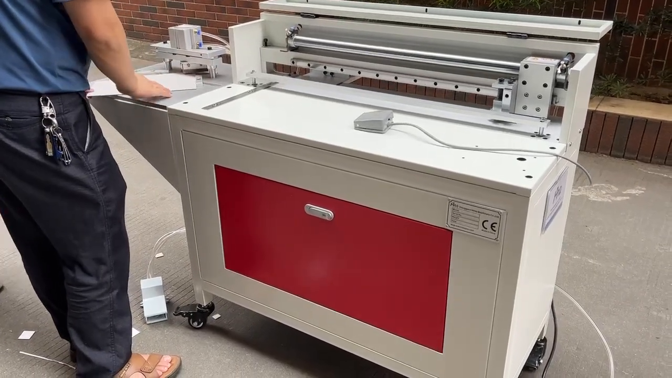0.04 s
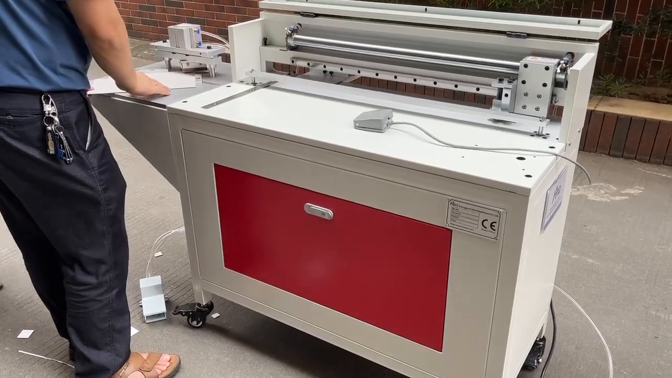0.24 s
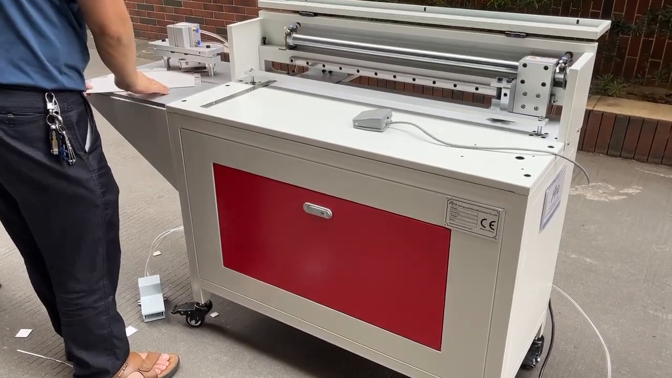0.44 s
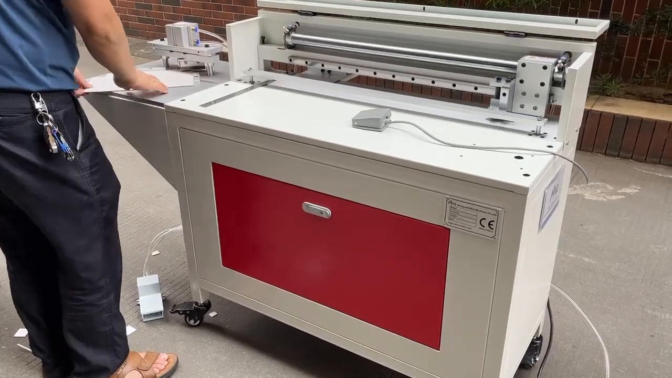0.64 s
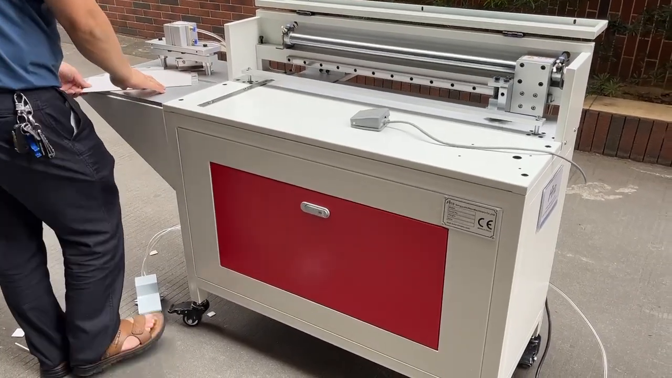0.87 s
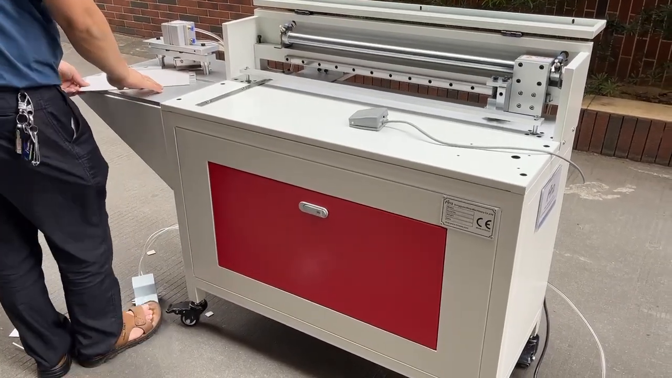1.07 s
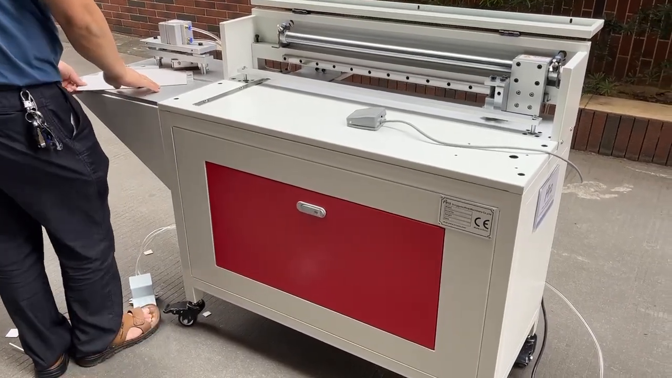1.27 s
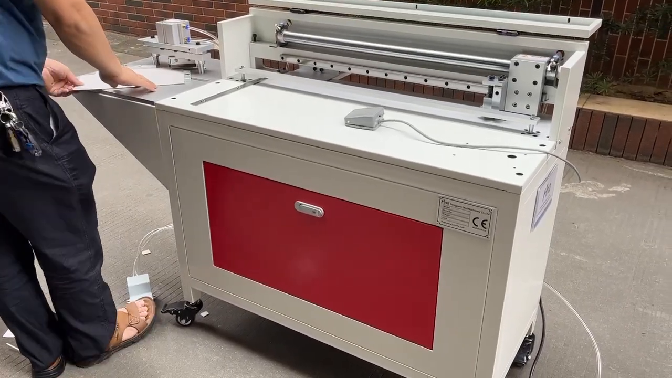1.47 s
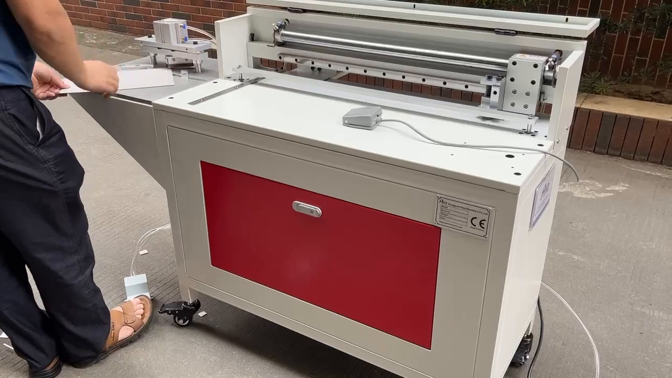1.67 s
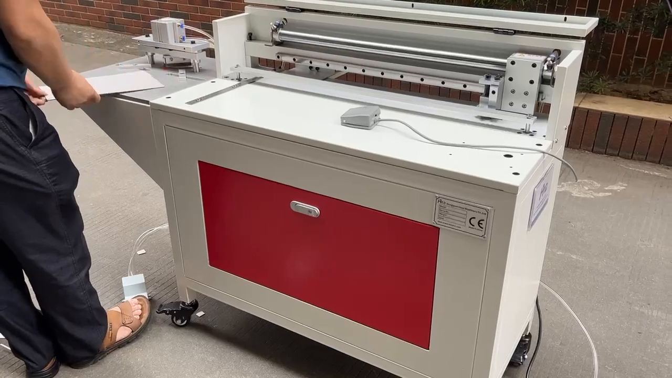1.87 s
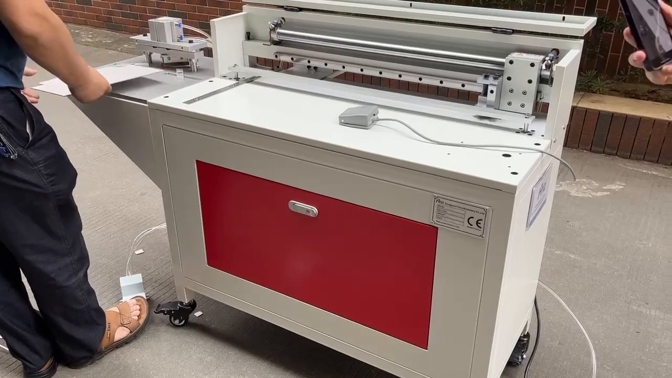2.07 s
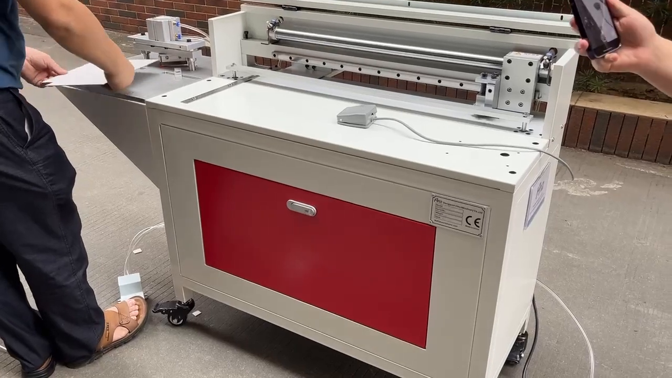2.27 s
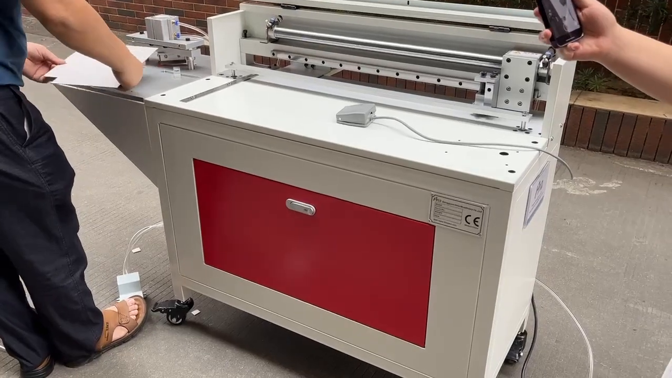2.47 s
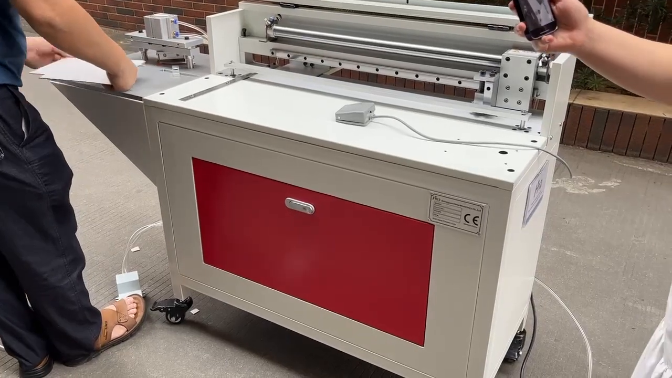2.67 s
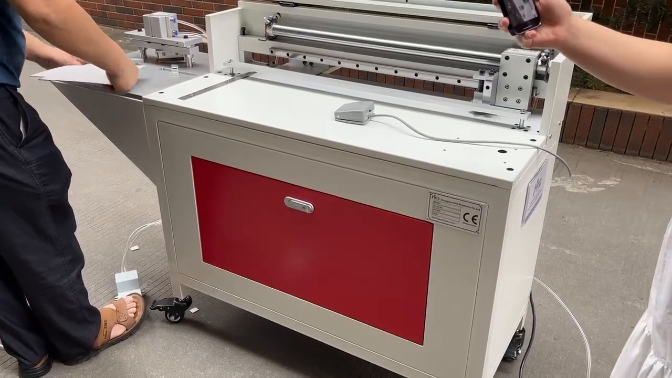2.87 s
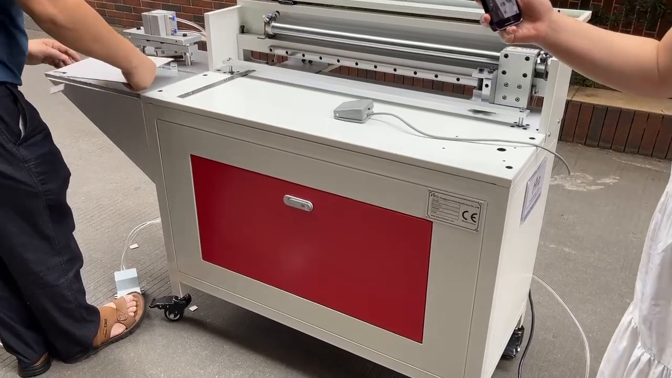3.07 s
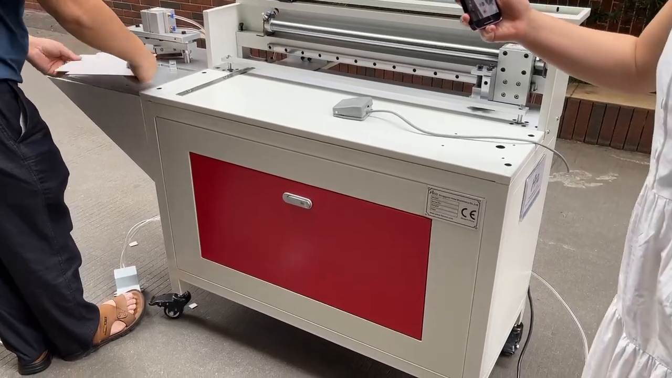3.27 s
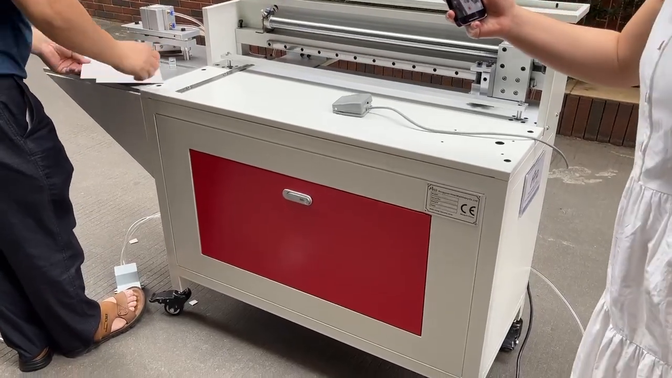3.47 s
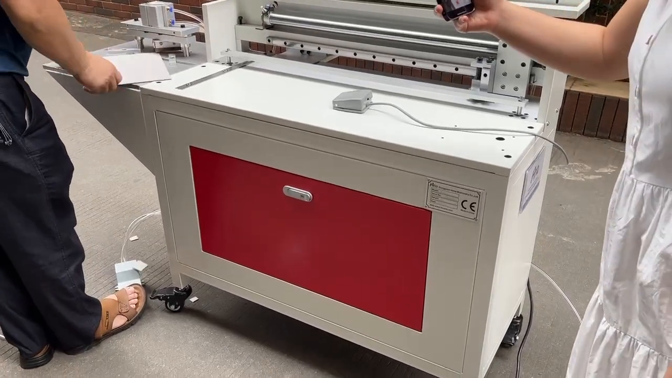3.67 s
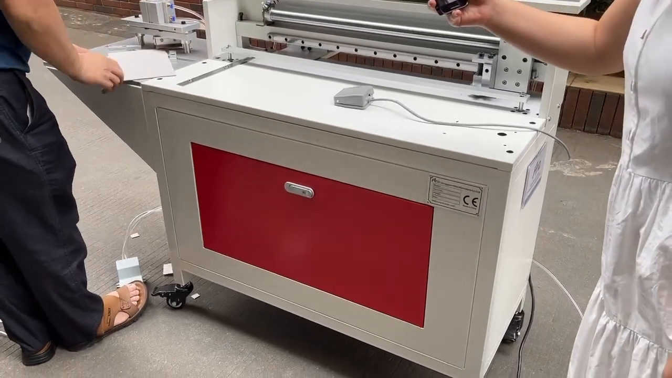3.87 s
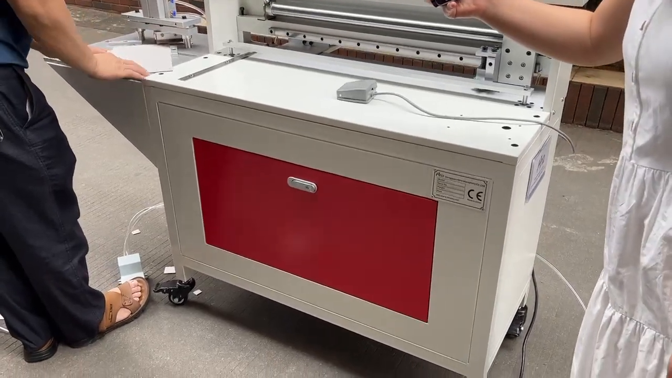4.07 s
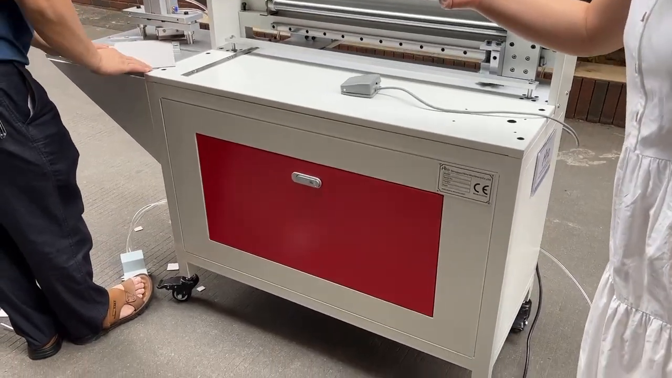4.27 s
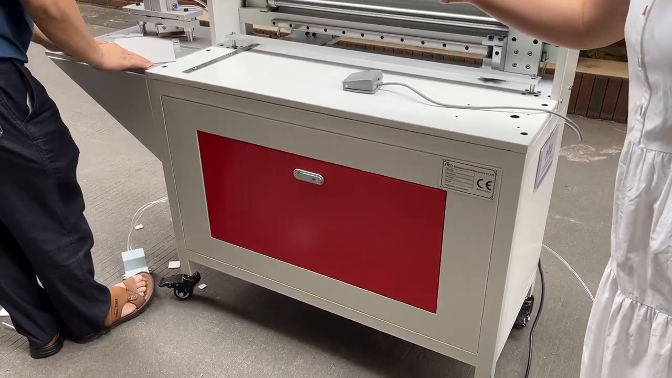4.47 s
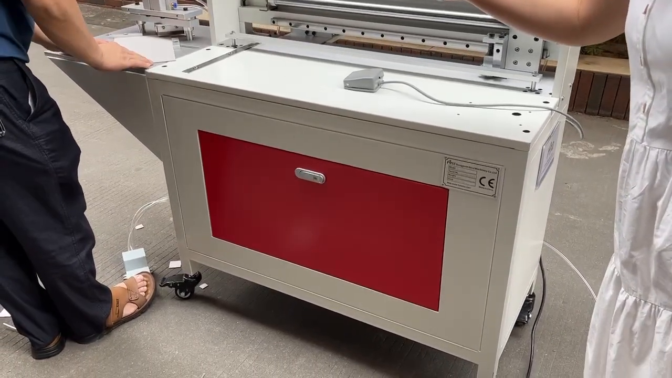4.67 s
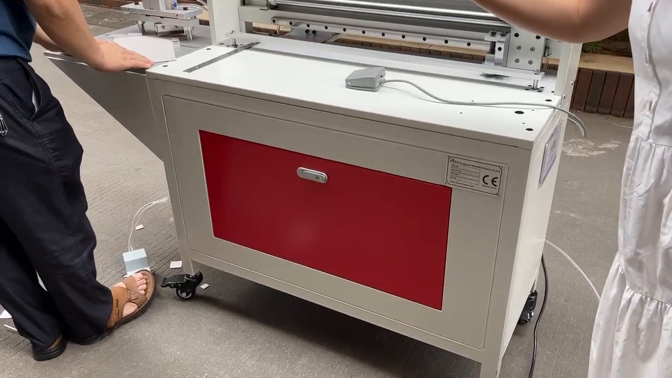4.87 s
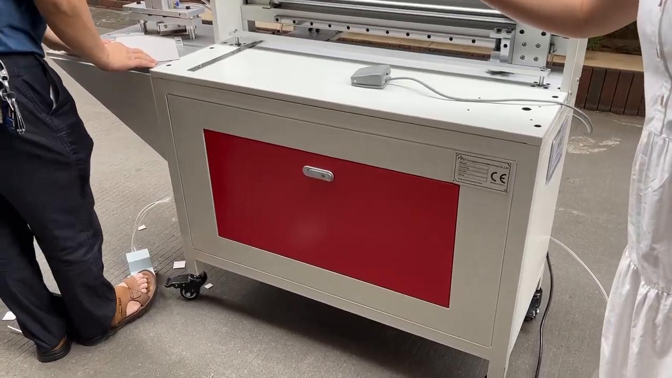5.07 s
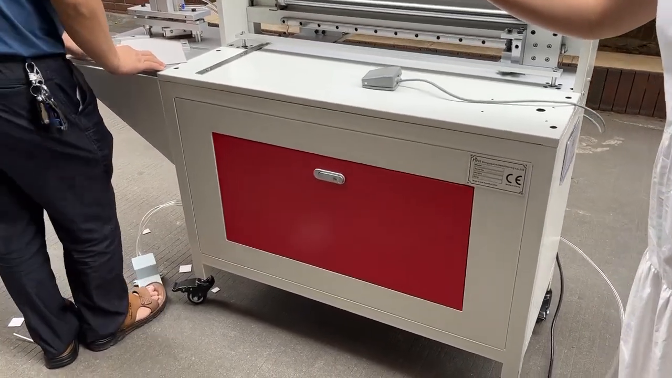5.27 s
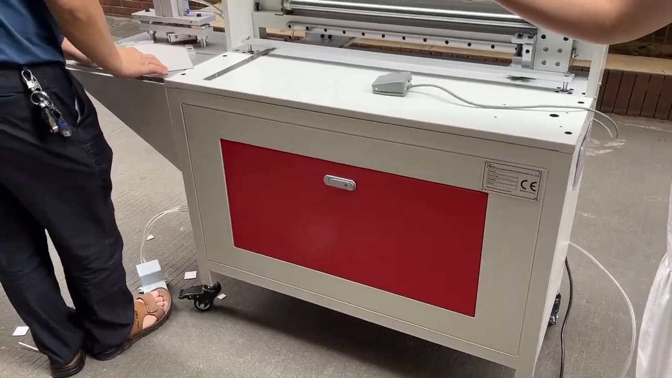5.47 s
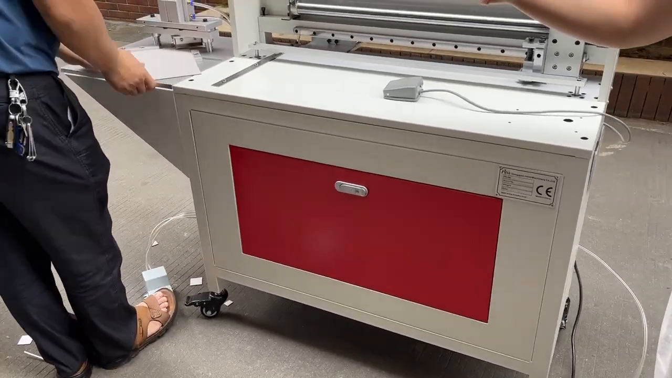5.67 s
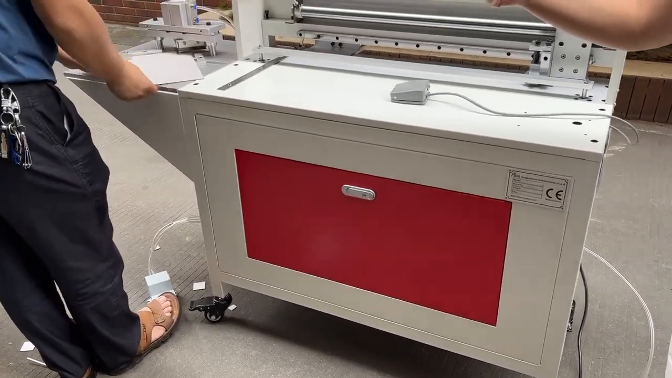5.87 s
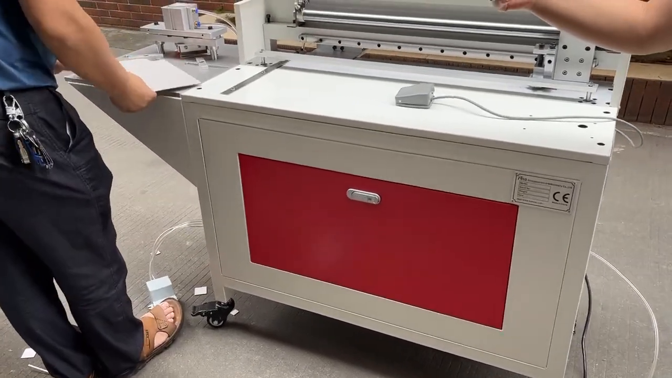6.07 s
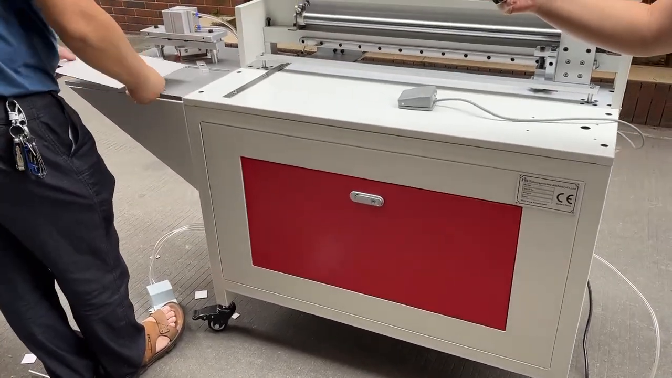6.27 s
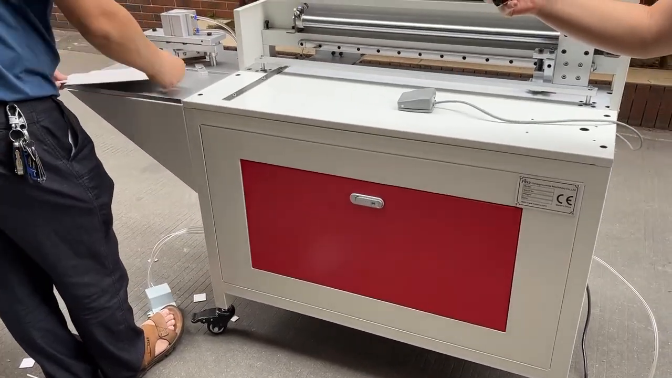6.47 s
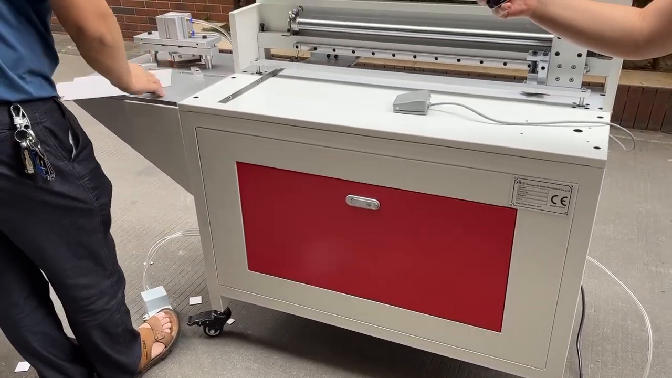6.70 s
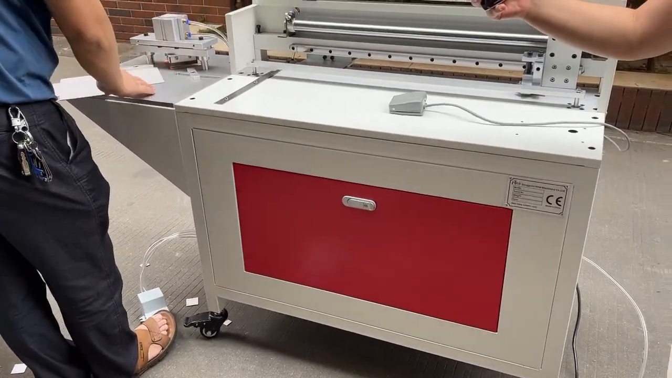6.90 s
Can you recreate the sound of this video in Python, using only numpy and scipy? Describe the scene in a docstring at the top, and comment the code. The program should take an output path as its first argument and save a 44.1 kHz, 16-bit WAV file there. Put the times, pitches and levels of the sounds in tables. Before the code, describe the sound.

In a brick-walled yard, a vacuum pump drones with slow pulsing swells under a steady airy hiss. Near the start a valve spits, a muffled thud shudders the frame, then a stronger air burst leads into a loud sheet-metal slam with rattling. After several seconds of plain drone and a faint card tap, the pair of blows repeats. A sharper card tap follows. Close stereo microphone, short outdoor reflections.

```python
"""Cardboard cutting and grooving machine

A vacuum pump drones in a walled yard; air hisses steadily through the feed table.
The machine works twice. In each cycle a valve spits air, a muffled thud sounds and a cylinder shudders;
the valve vents again, the carriage slams into the sheet-steel cabinet and the frame shudders once more.
Pump: tones locked to the shaft, plus noise. Impacts: decaying modes and noise. Air and card: shaped noise."""
import sys
import numpy as np
from scipy import signal
from scipy.fft import rfft, irfft, next_fast_len
from scipy.io import wavfile
from scipy.ndimage import uniform_filter1d, map_coordinates

SR = 44100
rng = np.random.default_rng(int(sys.argv[2]) if len(sys.argv) > 2 else 0)


def generate_wav(sig):
    """Save sig (samples, or channels by samples) to the path in sys.argv[1] as 16-bit PCM at SR."""
    pcm = np.round(np.clip(np.atleast_2d(sig).T, -1, 1) * 32767).astype(np.int16)
    wavfile.write(sys.argv[1], SR, pcm)


N = 306054

# Steady pump tones. Each row: multiple of the shaft rate, mean level in dB.
PUMP_TONES = [(2, -49.5), (3, -58), (4, -56), (5, -63.5), (7, -59), (10, -61), (11, -71), (12, -67),
              (13, -61.5), (14, -63), (15, -60.5), (19, -55.5), (24, -60), (36, -71), (37, -62), (40, -66),
              (41, -65), (43, -60.5), (45, -66.5)]
# Beating pump tones. Each row: multiple of the shaft rate, level in dB, beats per second,
# depth 0-1, time of a strong crest in seconds.
BEATING_TONES = [(8, -52, 0.928, 0.58, 2.85), (9, -58, 0.375, 0.9, 2.3)]
# Swells of the main pump tone. Each row: start in seconds, crest level in dB.
HUM_SWELLS = [(-0.15, -43), (0.55, -40.5), (1.351, -42.5), (1.9, -40.5), (2.56, -44), (3.17, -38.5),
              (4.08, -44.5), (4.68, -42), (5.35, -40), (5.92, -39), (6.78, -44), (7.3, -45)]
# Air churned by the pump. Each row: frequency in Hz, relative level in dB per Hz.
DRONE_SPECTRUM = [(15, -24), (25, -24), (59, 0), (85, -0.5), (151, -8.5), (216, -7), (270, -11), (344, -11),
                  (393, -8.5), (448, -6), (571, -5.5), (715, -13.5), (1000, -11), (1210, -15), (1510, -14),
                  (2200, -23.5), (2860, -37), (4840, -120)]
# Upper pump orders. Each row: frequency in Hz, relative level in dB.
WHINE_SPECTRUM = [(250, 13), (550, 0), (750, 8.5), (1050, 2.5), (1500, -20), (2100, 4), (3200, -1),
                  (4200, 4), (5200, 1), (7000, -56)]
# Air drawn through the feed table. Each row: frequency in Hz, relative level in dB per Hz.
HISS_SPECTRUM = [(880, -12), (1500, -9), (1960, -8), (2650, 2), (3360, 1), (4090, -5.5), (5430, -0.5),
                 (6500, -8.5), (7500, -17.5), (9500, -24), (11200, -15.5), (12500, -38.5)]
# Stretch of harder hiss: start in seconds, end in seconds, ramp in seconds, gain in dB.
HISS_SWELL = (0.4, 4.74, 0.22, 1.68)
# Carriage contacts. Each row: start in seconds, relative level in dB, muffling edge in Hz,
# then gains in dB: contact on the stop, boom band, knock band, clank band of the contact.
BLOWS = [(0.097, -33.5, 604, -3, -3.5, 0, 3), (1.119, -22.5, 380, 6, 1.5, 0.5, 8),
         (1.160, -28, 400, 2, 2.5, -2, -3), (1.198, -30, 1810, -6, -3, -3, -7),
         (1.486, -17, 4080, 7, -4, 4.5, -9), (1.503, -22.5, 3500, 0, -2.5, 1, 2),
         (1.690, -35.5, 2390, -15, 7, 2, -4), (1.724, -42, 2150, -15, 0.5, -6, 1),
         (5.199, -20.5, 340, 8, 1, -6, 2), (5.272, -26.5, 1900, 0, 1.5, -0.5, 2),
         (5.611, -16, 4300, 6, -2.5, -2, 1.5), (5.625, -23.5, 1490, 1, 2, 3, 7),
         (5.660, -24, 883, -8, 3.5, -2, -2), (5.757, -29, 704, -4, -5, 2, -6),
         (5.887, -37, 617, -1, 8.5, -3, -5)]
# Cabinet modes. Each row: frequency in Hz, relative level in dB, t60 in seconds.
CABINET_MODES = [(191.3, 1.5, 0.71), (266.2, -1.5, 0.19), (363.7, 5.5, 0.62), (440, 4, 0.43),
                 (540.4, 0.5, 0.65), (565, -0.5, 0.73), (749, -2.5, 0.6), (796, -6, 0.43), (853, -3, 0.51),
                 (941, -0.5, 0.31), (1128, -1.5, 0.4), (1256, -4.5, 0.56), (1348, -5, 0.85),
                 (1435, -5.5, 1), (1680, -4, 0.25), (1855, -6, 0.3), (1900, -6, 0.32), (2040, -6.5, 0.48),
                 (2110, -7, 0.4), (2220, -4, 0.47), (2740, -10, 0.22), (3070, -7, 0.42), (3390, -6, 0.35)]
# Heavily damped steel stop. Each row: frequency in Hz, relative level in dB, t60 in seconds.
STOP_MODES = [(277.3, 0, 0.092), (445, -1.5, 0.047), (551.5, 3.5, 0.076), (594, 2, 0.069),
              (950, 3.5, 0.034), (1707, 6, 0.038), (1857, 5, 0.025), (2008, -5, 0.061), (2237, -2, 0.034),
              (2684, 4, 0.019), (3240, -2.5, 0.049), (3840, -7, 0.037)]
# Dense modes of the thin panels. Each row: frequency in Hz, relative level in dB per Hz.
PANEL_SPECTRUM = [(30, -31), (60, 0), (150, 0.5), (240, 0), (300, -4.5), (370, 1.5), (560, -0.5), (750, -3),
                  (930, -12), (1400, -3), (1580, -15), (1720, -11.5), (1950, -4), (2450, -10), (3000, -8),
                  (4500, -19), (9000, -48)]
# Panel decay. Each row: frequency in Hz, t60 in seconds.
PANEL_T60_S = [(100, 0.8), (400, 0.29), (1000, 0.32), (3000, 0.28), (9000, 0.15)]
# Crack of the contact. Each row: frequency in Hz, relative level in dB per Hz.
CRACK_SPECTRUM = [(60, 14), (260, 10), (380, 6.5), (560, 8.5), (750, -10), (1000, 16), (1450, -22),
                  (1720, -2), (2800, -3), (4200, -11), (9000, -36)]
# Yard decay. Each row: frequency in Hz, t60 in seconds.
YARD_T60_S = [(100, 1.76), (500, 0.99), (2000, 1.08), (5000, 0.56), (11000, 0.31)]
# Strength of the walls' answer. Each row: frequency in Hz, relative level in dB.
ECHO_SPECTRUM = [(60, 11), (400, -4), (2000, -3.5), (5000, 0), (11000, -6)]
# Valve exhausts. Each row: start in seconds, level in dB, rise in seconds, t60 in seconds,
# sizzle relative to jet in dB.
PUFFS = [(1.037, -30, 0.017, 0.19, 2.5), (1.080, -28, 0.017, 0.27, -6), (1.415, -20, .016, 0.28, -5),
         (5.119, -30.5, 0.012, 0.2, -1), (5.157, -29, 0.022, 0.26, -7), (5.533, -20.5, 0.021, 0.314, -9)]
# Exhaust jet. Each row: frequency in Hz, relative level in dB per Hz.
JET_SPECTRUM = [(100, -15), (290, -8), (520, 4.5), (780, -0.5), (1090, 7.5), (1350, -0.5), (1720, 4),
                (1880, 3), (2030, 5), (2300, 2), (2780, 5.5), (3300, 1.5), (4300, 3.5), (5300, -1.5),
                (6480, 0.5), (8500, -5.5), (12000, -9)]
# Sizzle on the jet. Each row: frequency in Hz, relative level in dB per Hz.
SIZZLE_SPECTRUM = [(6000, -59), (9000, 6), (10200, 4.5), (11300, 1), (12500, -54)]
# Clicks of the valve's spool. Each row: start in seconds, relative level in dB.
SPURTS = [(1.048, -33), (1.06, -35), (1.430, -21), (1.436, -23), (5.126, -24), (5.144, -27), (5.169, -31),
          (5.182, -26), (5.203, -33), (5.543, -29), (5.555, -25.5), (5.563, -27)]
# Valve body modes. Each row: frequency in Hz, relative level in dB, t60 in seconds.
SPOOL_MODES = [(1117, 2, 0.066), (1810, -15, 0.037), (2376, -1, 0.03), (2780, -5, 0.07), (3920, -5, 0.1),
               (4624, -5, 0.14), (5380, -4, 0.086), (6560, -9, 0.071)]
# Clatter of loose parts. Each row: start in seconds, length in seconds, first relative level in dB,
# fall in dB.
CLATTERS = [(1.114, 0.19, -33, 9), (1.497, 0.29, -25.5, 16), (5.195, 0.22, -28, 7), (5.62, 0.31, -23, 17)]
# Cylinder strokes, down and back. Each row: start in seconds, travel in seconds, final relative level in dB,
# growth on the way in dB, settled frame pitch in Hz, quiver left afterwards in dB.
STROKES = [(1.115, 0.13, -21, 15, 86.8, -15), (1.495, 0.25, -28.5, 10, 96.8, -9.5),
           (5.19, 0.13, -24, 8, 88.5, -9), (5.64, 0.079, -25.5, -5, 77.13, -11.5)]
# Loose guides. Each row: frequency in Hz, relative level in dB per Hz.
RATTLE_SPECTRUM = [(35, -10), (150, 3.5), (280, 7.5), (540, -10), (800, -13.5), (1400, -9), (1800, -14),
                   (2900, -15), (4500, -24), (9000, -35)]
# Card dragged over the table. Each row: start in seconds, length in seconds, level in dB.
SCRAPES = [(1.256, 0.097, -42.5), (5.49, 0.064, -42.5)]
# Card tapping the table. Each row: start in seconds, relative level in dB.
TAPS = [(3.480, -37.5), (6.520, -24.5)]
# Card edge. Each row: frequency in Hz, relative level in dB per Hz.
CARD_SPECTRUM = [(300, -21), (850, -9), (1110, 14), (1270, -7), (1420, 12.5), (1600, -1), (1830, 11),
                 (2200, 2), (2550, 5), (2970, 8), (3400, 2), (4020, 2.5), (4810, -3), (6200, -8),
                 (9000, -22)]
# Stereo width of the pump. Each row: frequency in Hz, side over mid in dB.
PUMP_WIDTH = [(60, -23), (110, -18), (230, -5), (350, -3), (630, -1), (1140, 2), (1400, 0.5), (1570, 7),
              (1800, -11), (2050, -8.5), (2700, -6.5), (4200, -2), (5500, -3), (7000, 3.5), (8500, 9),
              (10000, 2.5)]
# Stereo width of everything else. Each row: frequency in Hz, side over mid in dB.
WORK_WIDTH = [(60, -36.5), (190, -41), (330, -21), (540, -3.5), (1140, -3), (1600, 3.5), (1900, -8.5),
              (2450, -7.5), (3100, -2), (4500, -4), (7000, -1.5), (8500, 6), (10000, -2)]
# Stereo balance. Each row: frequency in Hz, left over right in dB.
LEFT_BALANCE = [(60, -0.5), (150, 2), (550, 2.5), (1200, -0.5), (2000, -1), (3700, 3), (6500, 4),
                (10000, -1)]

SHAFT_HZ, MAINS_HZ = 23.7, 100
HUM_ORDER, HUM_TROUGH = 6, 0.14  # multiple of the shaft rate; share of the crest left between swells
ALTERNATE, FOURTH = 0.18, 0.066  # shares by which every second and every fourth beat is stronger
WAVER_DB, MAINS_DB, WHINE_DB, DRONE_DB, HISS_DB = 1.8, -50.5, -49.5, -45, -48
THUD_LOW_HZ = 55  # the blows carry little sound below this
BOOM_HZ, KNOCK_HZ, CLANK_HZ = (70, 357), (450, 656), (790, 1360)  # depend on where the carriage lands
BLOOM_S, CONTACT_RISE_S = 0.0057, 0.00087  # the panels pick up a blow more slowly
BLUR_HZ = 7
SPUTTER_DB, SURGE_DB = 1.2, 1.0  # fast and slow unevenness of the jet
SPURT_RING_DB, SPURT_AIR_DB, SPURT_T60_S = -5.5, 0, 0.02
CLINK_HZ, CLINK_SPREAD, CLINK_CYCLES = 1344, 0.55, 42  # typical pitch, scatter (natural log), t60 in cycles
CLINKS_PER_S = 90
SHUDDER_ATTACK_S, SHUDDER_T60_S, QUIVER_T60_S = 0.029, 0.2, 2.5
START_SHARP, SETTLE_S = 0.15, 0.034  # share by which the pitch starts high; time constant of its settling
SWING_JITTER, SWING_DB, RATTLE_DB = 0.05, 1.0, -11.5
YARD_DB, YARD_DELAY_S = -10.0, 0.02
LEFT_LEAD_S = 0.000012
LOW_CUT_HZ, TOP_HZ = 29, 11900


def amp(db):
    """Decibels to gain."""
    return 10 ** (np.asarray(db) / 20)


def along(points, hz):
    """(Hz, value) points read on a log frequency axis."""
    point_hz, value = np.transpose(points)
    return np.interp(np.log(hz + 1), np.log(point_hz + 1), value)


def wobble(knots_per_s):
    """Smooth random curve through Gaussian knots."""
    knots = rng.standard_normal(int(N * knots_per_s / SR) + 4)
    return map_coordinates(knots, [np.arange(N) * knots_per_s / SR])


def filtered(x, response):
    """x times a response of frequency."""
    n = x.shape[-1]
    padded = next_fast_len(n + SR // 10)
    spectrum = rfft(x, padded) * response(np.fft.rfftfreq(padded, 1 / SR))
    return irfft(spectrum, padded)[..., :n]


def noise(spectrum, width, size):
    """Coloured stereo noise whose middle has rms 1."""
    def colour(hz):
        return amp(along(spectrum, hz)) * np.array([np.ones_like(hz), amp(along(width, hz))])

    mid, side = filtered(rng.standard_normal((2, size)), colour)
    return np.array([mid + side, mid - side]) / np.std(mid)


def dying(x, t60s):
    """Each frequency of x fades at its own speed."""
    hz, t, z = signal.stft(x, SR, nperseg=256)
    decay = amp(-60 * t / along(t60s, hz)[:, None])
    return signal.istft(z * decay, SR)[1][:, :x.shape[-1]]


def fade(t, t60_s):
    """Exponential decay by 60 dB in t60_s."""
    return np.exp(-np.log(1000) * t / t60_s)


def add(out, start_s, x):
    """Mix x into out from start_s."""
    part = out[:, round(start_s * SR):][:, :x.shape[-1]]
    part += x[:, :part.shape[-1]]


def patchy(x, depth_db):
    """Turbulence: patches of x, some hundred hertz wide, swell and sink."""
    z = signal.stft(x, SR, nperseg=1024)[2]
    field = rng.standard_normal(z.shape[1:])
    field = uniform_filter1d(field, size=7, axis=0)
    field = uniform_filter1d(field, size=8, axis=1)
    return signal.istft(z * amp(depth_db * field / np.std(field)), SR)[1][:, :x.shape[-1]]


def ringing(modes, t):
    """Modes of random strength; loose joints blur their pitch; phase differs between the channels."""
    hz, level_db, t60_s = np.transpose(modes)[:, :, None]
    strength = amp(level_db + 1.1 * rng.standard_normal(hz.shape)) * fade(t, t60_s)
    steps = rng.standard_normal((len(hz), len(t)))
    blur = np.cumsum(steps, axis=1) * np.sqrt(2 * np.pi * BLUR_HZ / SR)
    phase = 2 * np.pi * (hz * t + rng.random(hz.shape)) + blur
    skew = np.arctan(amp(along(WORK_WIDTH, hz)))
    return np.array([np.sum(strength * np.sin(phase + side * skew), axis=0) for side in (-1, 1)])


def boost(x, band_hz, db):
    """Raise or lower one broad band of x."""
    edges_hz = np.clip(np.sort(band_hz), 20, SR / 4)
    band = signal.butter(1, edges_hz, "bandpass", fs=SR, output="sos")
    return x + (amp(db) - 1) * signal.sosfilt(band, x)


def hum(tone):
    """The main pump tone rises and falls in rounded swells."""
    starts_s, crest_db = np.transpose(HUM_SWELLS)
    beat = np.interp(np.arange(N) / SR, starts_s, np.arange(len(starts_s)))
    crest = amp(uniform_filter1d(crest_db[beat.astype(int)], size=4000))
    return crest * np.hypot(np.sin(np.pi * beat), HUM_TROUGH) * tone(HUM_ORDER)


def beating(tone):
    """Two more pump tones swell and fade in regular beats, strong and weak by turns."""
    out, t = np.zeros(N), np.arange(N) / SR
    for order, db, beats_per_s, depth, crest_s in BEATING_TONES:
        angle = 2 * np.pi * beats_per_s * (t - crest_s)
        swell = np.abs(1 + depth * np.exp(1j * angle))
        swell = swell * (1 + ALTERNATE * np.cos(angle / 2) + FOURTH * np.cos(angle / 4))
        out += amp(db) * swell * tone(round(order))
    return out


def suction():
    """Air hisses steadily through the feed table, with one broad swell."""
    start_s, end_s, ramp_s, gain_db = HISS_SWELL
    t = np.arange(N) / SR
    swell = np.clip(np.minimum(t - start_s, end_s - t) / ramp_s, 0, 1)
    level_db = HISS_DB + gain_db * swell + 0.38 * wobble(11.0)
    return amp(level_db) * patchy(noise(HISS_SPECTRUM, PUMP_WIDTH, size=N), depth_db=1.9)


def pump():
    """Tones and a vane rattle repeat with each shaft turn; the churned air throbs with the shaft."""
    turns = np.cumsum(SHAFT_HZ * (1 + 0.0015 * wobble(2) + 0.0008 * wobble(15))) / SR

    def tone(order):
        return np.sqrt(2) * np.sin(2 * np.pi * (order * turns + rng.random()))

    low = hum(tone) + beating(tone)
    low = low + sum(amp(db + WAVER_DB * wobble(3.5)) * tone(order) for order, db in PUMP_TONES)
    mains = amp(MAINS_DB + 1.1 * wobble(2.55)) * np.sin(2 * np.pi * MAINS_HZ * np.arange(N) / SR)

    # one turn of noise, repeated: a comb of weak upper orders
    size = round(SR / SHAFT_HZ)

    def vane_rattle():
        pattern = noise(WHINE_SPECTRUM, PUMP_WIDTH, size=size)
        return np.array([map_coordinates(p, [turns * size % size], mode="grid-wrap") for p in pattern])

    drift = 1.1 * wobble(2)  # mixes two patterns
    whine = np.cos(drift) * vane_rattle() + np.sin(drift) * vane_rattle()
    throb = 1 + 0.043 * np.sin(2 * np.pi * turns) + 0.068 * np.sin(4 * np.pi * turns)
    churn = patchy(noise(DRONE_SPECTRUM, PUMP_WIDTH, size=N), depth_db=1.2)
    drone = amp(DRONE_DB + 0.4 * wobble(5.3)) * churn
    return low + mains + amp(WHINE_DB) * whine + throb * drone + suction()


def carriage():
    """Each contact cracks on the steel stop, shakes the thin panels and leaves the cabinet ringing."""
    out, t = np.zeros((2, N)), np.arange(SR) / SR
    for start_s, db, edge_hz, contact_db, boom_db, knock_db, clank_db in BLOWS:
        chatter = amp(1.5 * wobble(103)[:SR])  # loose panels buzz unevenly as they die
        panels = dying(noise(PANEL_SPECTRUM, WORK_WIDTH, size=SR), PANEL_T60_S)
        body = amp(-13.0) * ringing(CABINET_MODES, t) + amp(-2.5) * panels
        body = chatter * body * (1 - np.exp(-t / BLOOM_S))
        crack = fade(np.maximum(t - 0.003, 0), 0.033) * noise(CRACK_SPECTRUM, WORK_WIDTH, size=SR)
        contact = amp(-4.0) * crack + amp(-4.5) * ringing(STOP_MODES, t)
        contact = amp(contact_db) * boost(contact, CLANK_HZ, clank_db)
        blow = (body + contact) * (1 - np.exp(-t / CONTACT_RISE_S))
        blow = boost(boost(blow, BOOM_HZ, boom_db), KNOCK_HZ, knock_db)
        band_hz = [THUD_LOW_HZ, min(edge_hz, SR / 4)]
        muffle = signal.butter(2, band_hz, "bandpass", fs=SR, output="sos")
        add(out, start_s, amp(db) * signal.sosfilt(muffle, blow))
    return out


def yard(x):
    """The brick walls answer with a delayed diffuse tail."""
    tail = dying(noise(ECHO_SPECTRUM, WORK_WIDTH, size=SR), YARD_T60_S)
    tail = np.pad(tail / np.linalg.norm(tail[0]), ((0, 0), (round(YARD_DELAY_S * SR), 0)))
    return signal.fftconvolve(x.mean(axis=0)[None], tail, axes=1)[:, :N]


def valve():
    """Air sputters out as the valve opens and dies as the cylinder empties."""
    out, t = np.zeros((2, N)), np.arange(SR // 2) / SR
    for start_s, db, rise_s, t60_s, sizzle_db in PUFFS:
        flow = np.minimum(t / rise_s, 1) * fade(np.maximum(t - rise_s, 0), t60_s)
        sputter_db = SPUTTER_DB * wobble(450) + SURGE_DB * wobble(110)
        jet = patchy(noise(JET_SPECTRUM, WORK_WIDTH, size=len(t)), depth_db=2.2)
        jet = amp(sputter_db[:len(t)]) * jet
        sizzle = noise(SIZZLE_SPECTRUM, WORK_WIDTH, size=len(t))
        sizzle = amp(sizzle_db + 1.6 * wobble(104)[:len(t)]) * sizzle
        add(out, start_s, amp(db) * flow * (jet + sizzle))
    return out


def spurts():
    """The valve's spool clicks; each click rings the body and lets out a short spit of air."""
    out, t = np.zeros((2, N)), np.arange(SR // 4) / SR
    for start_s, db in SPURTS:
        spit = amp(SPURT_AIR_DB) * fade(t, SPURT_T60_S) * noise(JET_SPECTRUM, WORK_WIDTH, size=len(t))
        ring = amp(SPURT_RING_DB) * ringing(SPOOL_MODES, t)
        add(out, start_s, amp(db) * np.minimum(t / 0.0025, 1) * (spit + ring))
    return out


def clinks():
    """Loose metal parts touch at uneven moments, each at its own pitches, on average ever more weakly."""
    out, t = np.zeros((2, N)), np.arange(SR // 16) / SR
    for start_s, length_s, db, fall_db in CLATTERS:
        for k, (jitter, strength, *pitches) in enumerate(rng.standard_normal((30, 6))):
            hz = np.clip(CLINK_HZ * np.exp(CLINK_SPREAD * np.array(pitches)), 300, 4000)
            modes = [(f, -6, CLINK_CYCLES / f) for f in hz]
            clink = np.minimum(t / 0.00046, 1) * ringing(modes, t)
            delay_s = (k + 1 + 0.35 * jitter) / CLINKS_PER_S
            if delay_s < length_s:
                level_db = db - fall_db * delay_s / length_s + 2.5 * strength
                add(out, start_s + delay_s, amp(level_db) * clink)
    return out


def shudder():
    """The travelling cylinder drives the frame's lowest resonance; loose guides rattle on every swing."""
    out, t = np.zeros((2, N)), np.arange(SR) / SR
    for start_s, travel_s, db, growth_db, frame_hz, quiver_db in STROKES:
        attack = np.minimum(t / SHUDDER_ATTACK_S, 1)
        build_up = amp(growth_db * np.minimum(t / travel_s - 1, 0))
        after_s = np.maximum(t - travel_s, 0)
        quiver = amp(quiver_db) * fade(after_s, QUIVER_T60_S)  # outlasts the stroke
        release = np.maximum(fade(after_s, SHUDDER_T60_S), quiver)
        pitch_hz = frame_hz * (1 + START_SHARP * np.exp(-t / SETTLE_S))
        pitch_hz = pitch_hz * (1 + SWING_JITTER * wobble(35.7)[:SR])
        swing = np.sin(2 * np.pi * np.cumsum(pitch_hz) / SR)
        force = amp(db + 1.5 * wobble(40)[:SR]) * attack * release
        rattle = amp(2.5 * wobble(70)[:SR]) * noise(RATTLE_SPECTRUM, WORK_WIDTH, size=SR)
        rattle = (1 + 0.5 * swing) * rattle
        add(out, start_s, force * (amp(SWING_DB) * build_up * swing + amp(RATTLE_DB) * rattle))
    return out


def card():
    """The edge of a card scrapes over the table or snaps against it: shaped noise."""
    out, t = np.zeros((2, N)), np.arange(SR // 5) / SR
    for start_s, db in TAPS:
        snap = np.minimum(t / 0.0015, 1) * fade(t, 0.049)
        add(out, start_s, amp(db) * snap * noise(CARD_SPECTRUM, WORK_WIDTH, size=len(t)))
    for start_s, length_s, db in SCRAPES:
        drag = np.sqrt(np.abs(np.sin(np.pi * np.minimum(t / length_s, 1))))
        level = amp(db + 1.7 * wobble(290)[:len(t)])
        add(out, start_s, level * drag * noise(CARD_SPECTRUM, WORK_WIDTH, size=len(t)))
    return out


def scene():
    """Pump, working parts and yard, with the balance set per frequency and the left channel leading."""
    work = valve() + spurts() + carriage() + clinks() + card()
    mix = pump() + work + shudder() + amp(YARD_DB) * yard(work)

    def placement(hz):
        level = amp(np.outer([1, -1], along(LEFT_BALANCE, hz)) / 2)
        return level * np.exp(1j * np.pi * LEFT_LEAD_S * np.outer([1, -1], hz))

    return filtered(mix, placement)


def record(dry):
    """Mid notched near 8450 Hz, top made mono, deep bass cut, peaks rounded off, treble ended at TOP_HZ."""
    mid, side = dry.mean(axis=0), (dry[0] - dry[1]) / 2
    mid = filtered(mid, lambda hz: amp(-27 * np.exp(-((hz - 8450) / 850) ** 2)))
    side = filtered(side, lambda hz: 1 / np.sqrt(1 + (hz / 10500) ** 70))
    pair = np.array([mid + side, mid - side])
    pair = filtered(pair, lambda hz: hz ** 4 / np.sqrt(hz ** 8 + LOW_CUT_HZ ** 8))
    pair = pair / (1 + (pair / 0.92) ** 6) ** (1 / 6)
    return filtered(pair, lambda hz: 1 / np.sqrt(1 + (hz / TOP_HZ) ** 180))


dry = scene()
out = record(dry)
generate_wav(out)
```